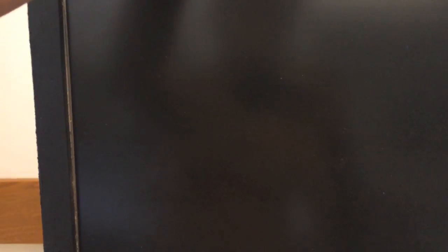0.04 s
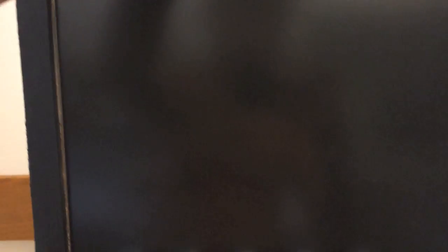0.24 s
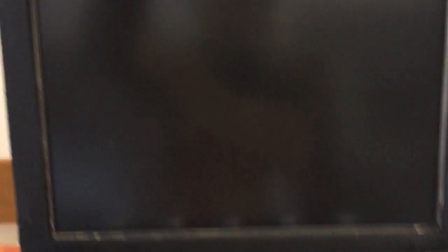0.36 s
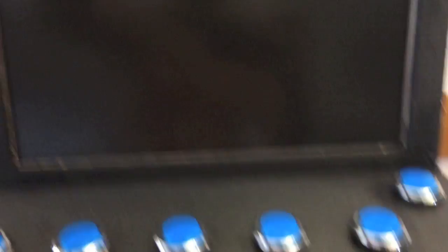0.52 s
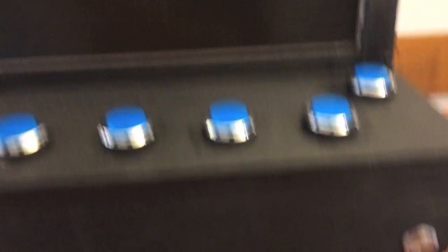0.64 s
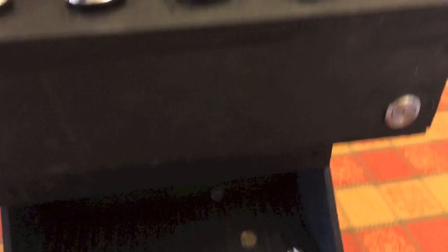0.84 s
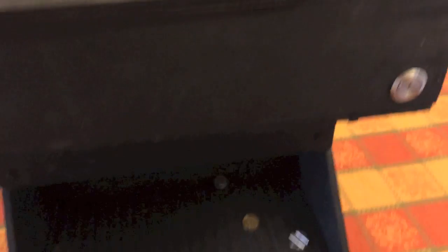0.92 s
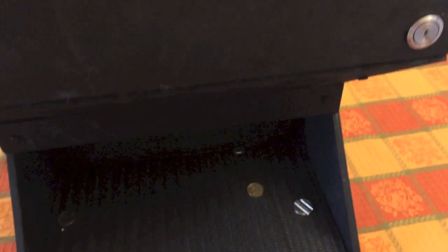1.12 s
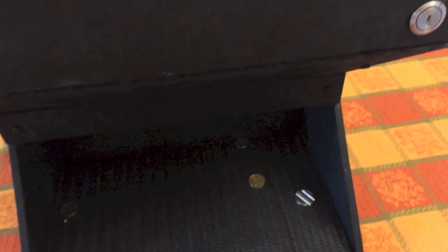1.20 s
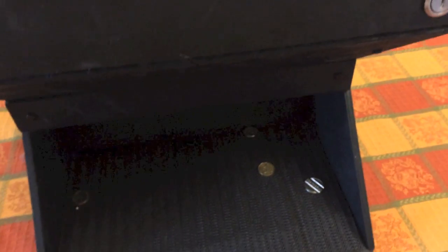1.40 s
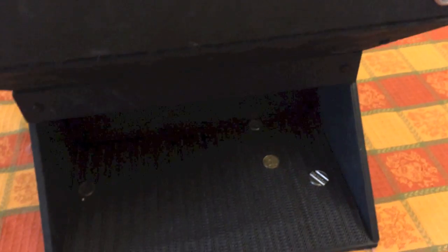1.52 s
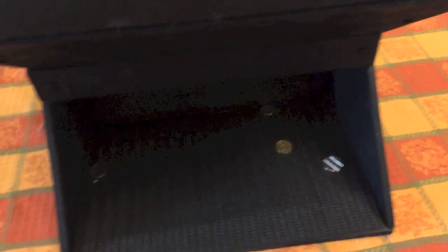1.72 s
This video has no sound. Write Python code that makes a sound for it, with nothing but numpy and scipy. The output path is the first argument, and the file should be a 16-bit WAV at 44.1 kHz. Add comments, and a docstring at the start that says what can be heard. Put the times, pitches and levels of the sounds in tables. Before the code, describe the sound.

Coins clink and rattle into a machine's metal tray in two quick bursts, then comes a single soft tap. The sound is near the microphone, in a quiet room with a faint low machine hum.

```python
"""Coins falling into a tray

A few coins clatter down a chute and drop into the tray of a cabinet in a quiet room; one soft, dry tap
follows. Each knock is a few milliseconds of chatter that gives a clack, a hollow thump, a bright tick
and three damped resonances. The tray rings briefly in its normal modes; cabinet and room reverberate.
Underneath lie a low machine hum, a rumble, a faint hiss and a fainter whine."""
import sys
import numpy as np
from scipy import signal
from scipy.fft import rfft, irfft
from scipy.io import wavfile

SR = 44100
rng = np.random.default_rng(int(sys.argv[2]) if len(sys.argv) > 2 else 0)


def persist_wave(psi):
    """Save psi, clipped to +-1, as 16-bit WAV."""
    counts = np.round(np.clip(psi, -1, 1) * 32767).astype(np.int16)
    wavfile.write(sys.argv[1], SR, np.atleast_2d(counts).T)


N = 77175
TIME = np.arange(N) / SR

# Knocks of the coins and, in the last row, a soft dry tap:
# t/s, contact time/s, clack f/Hz, clack level/dB, thump level/dB, tick level/dB,
# gain into cabinet/dB, gain into room and tray/dB, then f/Hz, level/dB for each of three rings
KNOCK_EVENTS = [ (0.037, 0.013, 1850, -53.5, -64.5, -67, 5, 3.5, 1600, -53, 2063, -52.5, 4160, -53.5),
                (.140, 0.0045, 3030, -46, -60.5, -63, 4, 1, 1810, -49, 3860, -61.5, 6400, -58),
                (.181, 0.0056, 2820, -51, -78.5, -76, 14, 16, 2450, -52.5, 3220, -57, 4030, -52),
                (0.1863, 0.0011, 4200, -43.5, -69, -55.5, -4, -2.5, 2580, -49.5, 4000, -47.5, 4770, -47),
                (0.207, .004, 4350, -37.5, -71, -58, 6, 1.5, 2700, -38.5, 4520, -43, 6760, -42),
                (0.238, 0.0032, 3030, -21.5, -31, -24, 0, -5, 730, -30, 3600, -33, 4630, -27),
                (.245, 0.011, 1530, -30.5, -36, -43.5, -4, -2.5, 1265, -31.5, 1785, -32, 6400, -31.5),
                (0.2952, 0.0056, 3200, -34, -43.5, -38, 2, -8.5, 1300, -37.5, 3650, -37, 6300, -41),
                (.303, 0.0075, 2240, -31, -49, -56.5, -4, -4.5, 754, -39.5, 1312, -32, 3550, -48),
                (0.3913, 0.0074, 3700, -30, -67.5, -34.5, 5.5, -5.5, 1850, -35.5, 3710, -32, 5680, -40.5),
                (.402, 0.0027, 3800, -40, -59.5, -49, 2.5, 1, 1000, -43, 1830, -44, 4860, -51.5),
                (.434, 0.0091, 2986, -39.5, -60, -53, 4, 7, 1756, -44, 3560, -58, 8000, -55),
                (.474, 0.0087, 2000, -24.5, -37.5, -46.5, -2.5, -14.5, 900, -28.5, 1138, -17, 2090, -24),
                (.497, 0.0085, 2420, -26.5, -35.5, -36.5, -3.5, -2.5, 1352, -27.5, 1910, -32, 2530, -39),
                (.510, 0.0019, 1100, -36, -48, -56.5, 0.5, 0.5, 265, -33, 359, -39.5, 1050, -34),
                (.560, 0.0073, 3300, -29.5, -47, -56, 2, -3.5, 1126, -30.5, 1928, -28, 5800, -43),
                (.576, 0.0079, 3480, -32.5, -44.5, -53.5, -1, -13.5, 2160, -32.5, 3990, -29.5, 5180, -35),
                (.589, 0.0033, 3000, -33, -46.5, -58, 5.5, -5.5, 2090, -31.5, 3990, -38, 5630, -46),
                (0.775, 0.0035, 2970, -53, -66.5, -67.5, -3.5, -5.5, 2150, -56, 3800, -58.5, 5200, -64),
                (0.785, 0.0058, 2200, -57.5, -56, -72.5, -5.5, -5, 1400, -62, 2110, -44, 3200, -47.5),
                (0.797, 0.0027, 2450, -21, -39.5, -41.5, 0.5, 3.5, 2310, -21, 3937, -20, 5860, -25.5),
                (.805, 0.007, 2250, -28.5, -39, -37.5, -3, 3, 1470, -35.5, 5270, -28.5, 11390, -42),
                (0.8875, 0.0062, 1540, -20, -25, -38, -5, -8, 210, -30.5, 982, -22, 2100, -20),
                (.908, 0.0019, 1290, -28, -43, -66, -4.5, -4.5, 350, -32, 1060, -29.5, 1600, -31.5),
                (0.9271, 0.00434, 2870, -26, -40, -57, 1.5, -21, 2250, -27, 3467, -36.5, 4500, -36),
                (1.2102, .002, 1560, -35.5, -61, -56, -7, -11, 985, -35.5, 1400, -34.5, 3430, -44), ]
def coins_and_tap(echo_sets=4, ring_transfer_db=-8):
    """Transient excitation: coins clatter into the tray, then one soft dry tap follows."""
    direct = np.zeros(N)
    # Knocks take turns among four sets of reflections, so their echoes vary slightly.
    to_cabinet, to_room = np.zeros((2, echo_sets, N))
    for k, row in enumerate(KNOCK_EVENTS):
        start_s, contact_s, clack_hz, clack_db, thump_db, tick_db, cabinet_db, room_db, *modes = row
        rough = knock(contact_s, clack_hz, clack_db, thump_db, tick_db)
        rings = sum(at_level(panel_ring(contact_s, hz), db) for hz, db in zip(modes[::2], modes[1::2]))
        span = slice(int(start_s * SR), int(start_s * SR) + len(rough))
        carried = rough + rings * from_db(ring_transfer_db)
        direct[span] += rough + rings
        to_cabinet[k % echo_sets, span] += carried * from_db(cabinet_db)
        to_room[k % echo_sets, span] += carried * from_db(room_db)
    reverberation = sum(map(cabinet, to_cabinet)) + sum(map(room, to_room))
    return direct + tray(to_room.sum(axis=0)) + reverberation


def knock(contact_s, clack_hz, clack_db, thump_db, tick_db):
    """Source and filter: chatter is shaped into a broad clack, a hollow thump and a bright tick."""
    clack = resonate(chatter(contact_s), clack_hz, q=0.88)
    clack = butter(clack, [374, 2.13 * clack_hz], "band")
    thump = butter(chatter(contact_s), [168, 550], "band")
    tick = butter(chatter(contact_s), 5500, "high", order=1)
    tick = butter(tick, 11500, "low")
    return at_level(clack, clack_db) + at_level(thump, thump_db) + at_level(tick, tick_db)


def contact_force(contact_s, samples=2048):
    """Finite contact time: the force holds steady, then falls away."""
    return np.exp(-(TIME[:samples] / contact_s) ** 4)


def chatter(contact_s):
    """Broadband excitation: many tiny contacts make a burst with an even spectrum."""
    force = contact_force(contact_s)
    burst = rng.standard_normal(len(force)) * force
    for _ in range(2):
        whitened = irfft(np.exp(1j * np.angle(rfft(burst))))
        burst = whitened * force
    return burst + 1e-18


def panel_ring(contact_s, hz, q=6.5):
    """Driven damped oscillator: a panel mode swells during contact and dies within a few cycles."""
    decay = np.exp(-np.pi * hz / q / SR)
    swell = signal.lfilter([1], [1, -decay], contact_force(contact_s))
    return swell * np.sin(2 * np.pi * hz * TIME[:len(swell)])


# Normal modes of the tray: f/Hz, relative level/dB, T60/s
TRAY_MODES = [(271.7, -9, 0.34), (345, -4, 0.36), (967, -2.5, 0.254), (1142, -7.5, 0.2), (1316, -7.5, 0.27),
              (1684, -4, 0.368), (1845, -6.5, 0.18), (2100, -4, 0.44), (2310, -2, 0.12), (2340, -3, 0.24),
              (2620, -3, 0.11), (3840, -11, .2), (4000, -1, 0.16), (6290, -5.5, 0.17), (6516, -8, 0.26)]
def tray(drive, coupling_db=-44):
    """Modal superposition: every knock leaves the tray ringing as a sum of decaying sinusoids."""
    t = TIME[:SR]
    response = sum(from_db(db + coupling_db) * np.sin(2 * np.pi * hz * t) * free_decay(t, t60)
                   for hz, db, t60 in TRAY_MODES)
    return signal.fftconvolve(drive, response)[:N]


# Reverberation of the cabinet: f/Hz, gain/dB, T60/s
CABINET_BANDS = [(120, -2.5, 0.26), (298.6, 2, 0.055), (600, 3, 0.16), (1280, 6, 0.085), (2366, 0.5, 0.16),
                 (4840, -3.5, 0.076), (9000, -4.5, 0.053), (15180, -4.5, 0.069)]
def cabinet(drive):
    """Small enclosure: short paths return the sound almost at once."""
    return reverberate(drive, CABINET_BANDS, delay_s=0.00078, build_s=0.0015)


# Reverberation of the room: f/Hz, gain/dB, T60/s
ROOM_BANDS = [(120, -2.5, .4), (302, 2.5, 0.27), (560, 1.5, .5), (790, 5, 0.49), (1200, 5.5, 0.42),
              (2400, -4.5, 0.57), (4800, -0.5, 0.44), (7300, 2.5, 0.37), (9500, -1.5, 0.31),
              (15100, -22.5, .25)]
def room(drive):
    """Large enclosure: longer paths give later reflections and a slower decay."""
    return reverberate(drive, ROOM_BANDS, delay_s=0.0083, build_s=0.0047)


def reverberate(drive, bands, delay_s, build_s):
    """Diffuse field: dense reflections build up after a delay and decay exponentially in each band."""
    t = TIME[:2 * SR // 3]
    edges_hz = np.geomspace(70, 17000, 19)
    white = rng.standard_normal((2, len(t)))
    onset = 1 - np.exp(-np.maximum(t - delay_s, 0) / build_s)
    response = 0
    for k, (low, high) in enumerate(zip(edges_hz, edges_hz[1:])):
        hz = np.sqrt(low * high)
        t60 = at_hz(bands, hz, column=2)
        tail = butter(white[k % 2], [low, high], "band") * onset * free_decay(t, t60)
        band_share = 2 * (high - low) / SR
        response += unit_energy(tail) * from_db(at_hz(bands, hz)) * np.sqrt(band_share)
    return signal.fftconvolve(drive, response)[:N]


# Partials of the machine's hum: f/Hz, level/dB before the envelope
HUM_PARTIALS = [(108, -57), (162, -60.5), (219, -57), (304, -68), (380, -69.5), (437, -71), (1749, -75)]
# Envelope of the hum: t/s, gain/dB
HUM_ENVELOPE = [(0, -2), (.6, -3), (1.05, -9.5), (1.25, 2.5), (1.45, 0), (1.75, -0.5)]
def hum(depth=0.17):
    """Random modulation: each partial of the machine's hum wavers in amplitude and phase."""
    partials = 0
    for hz, db in HUM_PARTIALS:
        waver = signal.resample(rng.standard_normal(32) + 1j * rng.standard_normal(32), N)
        carrier = np.exp(2j * np.pi * (hz * TIME + rng.random()))
        partials += from_db(db) * np.real((1 + depth * waver) * carrier)
    return np.sqrt(2) * partials * envelope(HUM_ENVELOPE)


# Spectral density of the rumble: f/Hz, relative level/dB
RUMBLE_SPECTRUM = [(25, -16.5), (60, -8), (130, -1), (250, -5), (500, -19.5), (1000, -20), (1800, -20),
                   (3500, -29.5), (8000, -50.5)]
# Envelope of the rumble: t/s, level/dB
RUMBLE_ENVELOPE = [(0, -54.5), (.7, -58), (.82, -49.5), (1.05, -62), (1.251, -56), (1.75, -56)]
def rumble():
    """Low-frequency random noise whose level drifts."""
    return coloured_noise(RUMBLE_SPECTRUM) * envelope(RUMBLE_ENVELOPE)


# Spectral density of the hiss: f/Hz, relative level/dB
HISS_SPECTRUM = [(1000, -11), (3500, -4), (6800, 0), (8500, -3.5), (10000, 2.5), (11500, 0.5), (12500, 4),
                 (15000, 0)]
# Envelope of the hiss: t/s, level/dB
HISS_ENVELOPE = [(0, -61.5), (.72, -60.5), (.85, -66), (1.08, -68), (1.17, -58.5), (1.301, -62),
                 (1.75, -62)]
def hiss():
    """Broadband random noise, weighted to the treble, whose level dips briefly."""
    return coloured_noise(HISS_SPECTRUM) * envelope(HISS_ENVELOPE)


def whine(hz=9810, q=22, db=-74):
    """Narrow-band noise: a faint high pitch that rises and falls with the hiss."""
    band = resonate(resonate(rng.standard_normal(N), hz, q), hz, q)
    return unit_energy(band * envelope(HISS_ENVELOPE)) * np.sqrt(N) * from_db(db)


def coloured_noise(spectrum):
    """Spectral shaping: white noise is weighted in frequency and scaled to unit power."""
    hz = np.maximum(np.arange(N // 2 + 1) * SR / N, 1)
    shaped = rfft(rng.standard_normal(N)) * from_db(at_hz(spectrum, hz))
    return unit_energy(irfft(shaped, N)) * np.sqrt(N)


def resonate(x, hz, q):
    """Second-order resonance of bandwidth hz / q."""
    r = np.exp(-np.pi * hz / q / SR)
    return signal.lfilter([1, 0, -1], [1, -2 * r * np.cos(2 * np.pi * hz / SR), r * r], x)


def butter(x, hz, kind, order=2):
    """Causal Butterworth filter."""
    return signal.sosfilt(signal.butter(order, hz, kind, fs=SR, output="sos"), x)


def free_decay(t, t60):
    """Exponential damping: 60 dB in the time t60."""
    return np.exp(-np.log(1000) * t / t60)


def from_db(db):
    """Amplitude ratio of a level."""
    return 10 ** (np.asarray(db) / 20)


def unit_energy(x):
    """Normalisation to an energy of one."""
    return x / np.sqrt(np.sum(x ** 2) + 1e-20)


def at_level(transient, db):
    """Equivalent level: a transient gets the energy of 8 ms of steady sound at db."""
    return unit_energy(transient) * from_db(db) * np.sqrt(.008 * SR)


def at_hz(points, hz, column=1):
    """Interpolation of a table column on a log-frequency axis."""
    table = np.array(points)
    return np.interp(np.log(hz), np.log(table[:, 0]), table[:, column])


def envelope(curve):
    """Amplitude over time from points of t/s, level/dB."""
    return from_db(np.interp(TIME, *np.transpose(curve)))


def scene():
    """Linear superposition: coins and tap over the quiet background, in one channel."""
    return (coins_and_tap() + hum() + rumble() + hiss() + whine())[None]


def record(dry, cutoff_hz=15200):
    """Band limiting: an elliptic low-pass cuts the top steeply."""
    return signal.sosfilt(signal.ellip(10, .2, 80, cutoff_hz, fs=SR, output="sos"), dry)


dry = scene()
out = record(dry)
persist_wave(out)
```